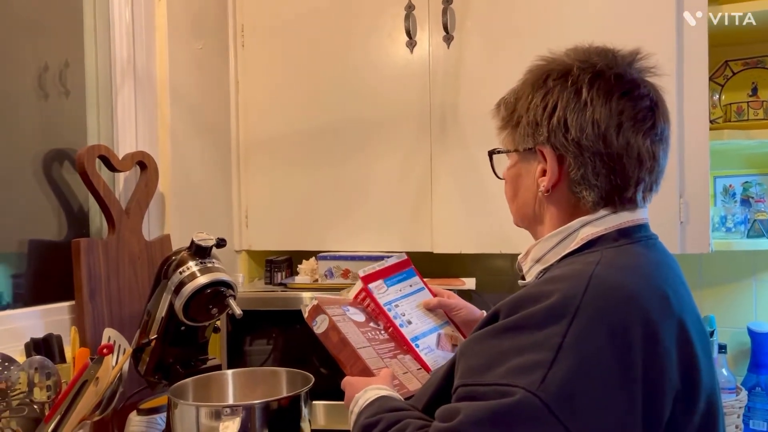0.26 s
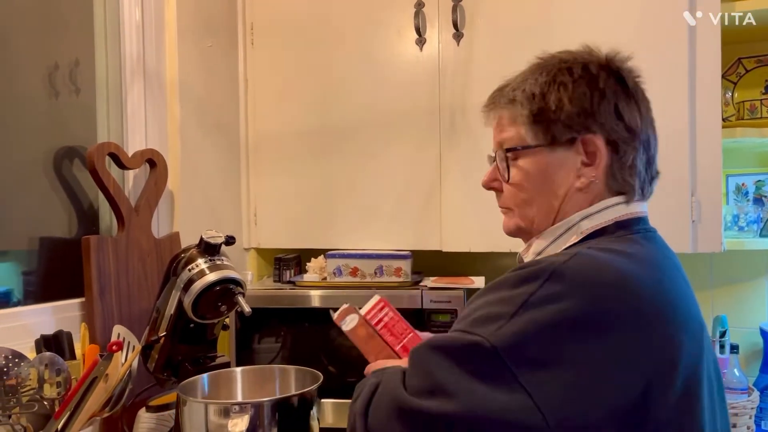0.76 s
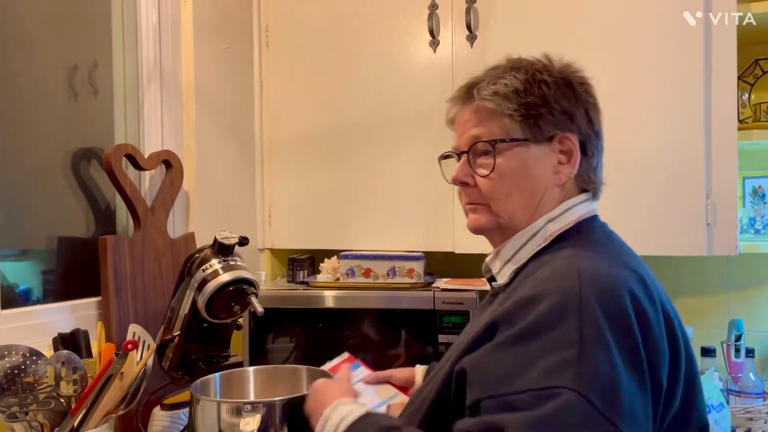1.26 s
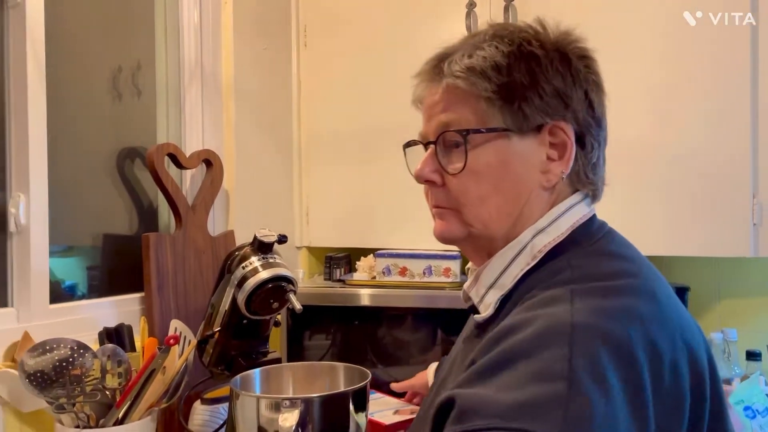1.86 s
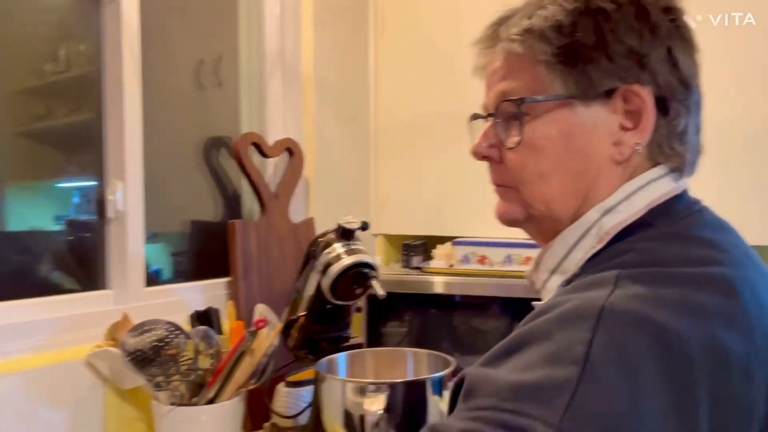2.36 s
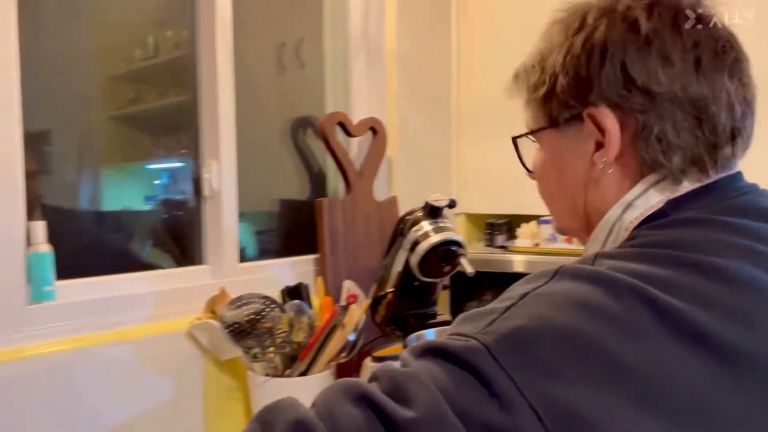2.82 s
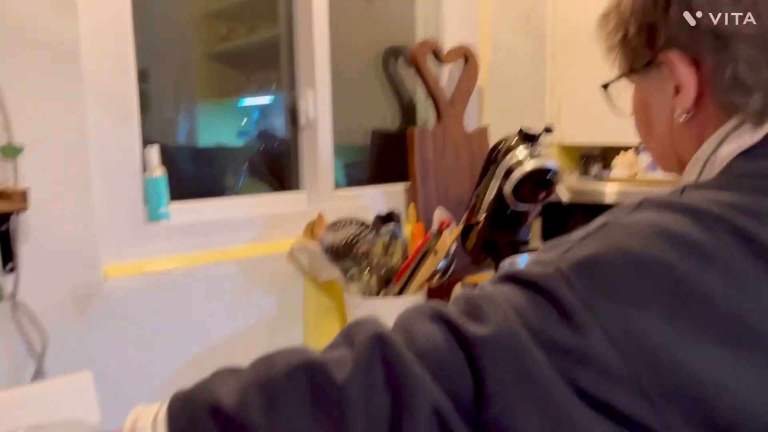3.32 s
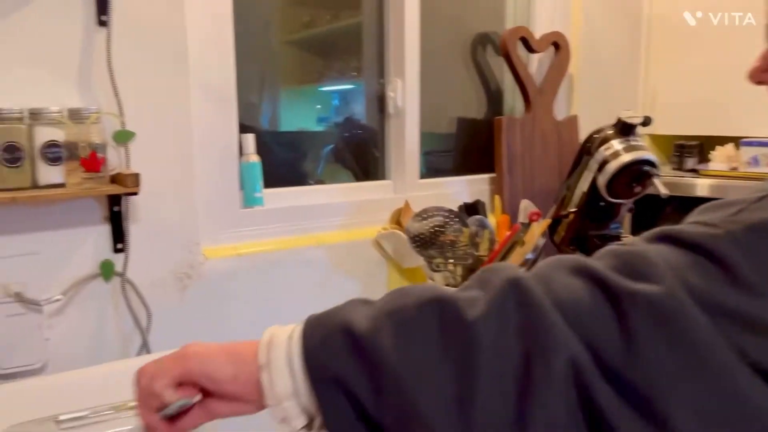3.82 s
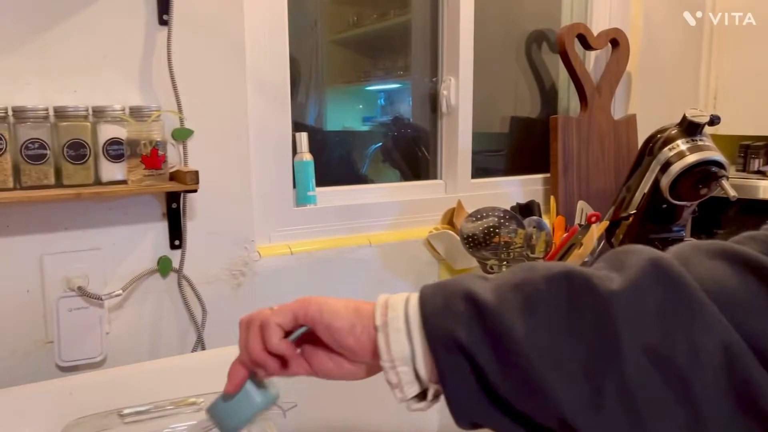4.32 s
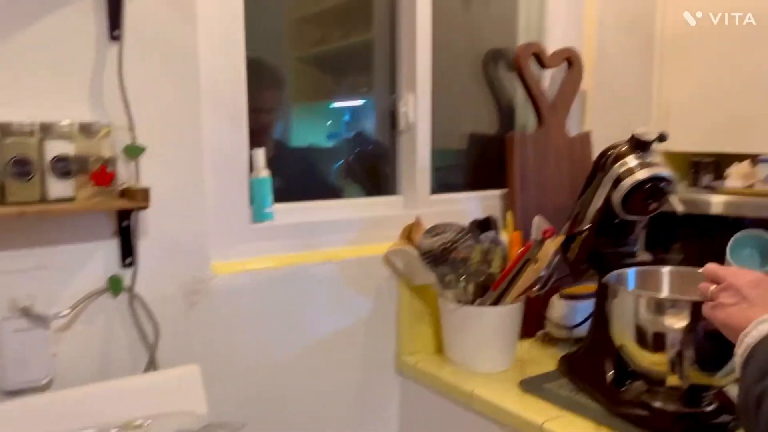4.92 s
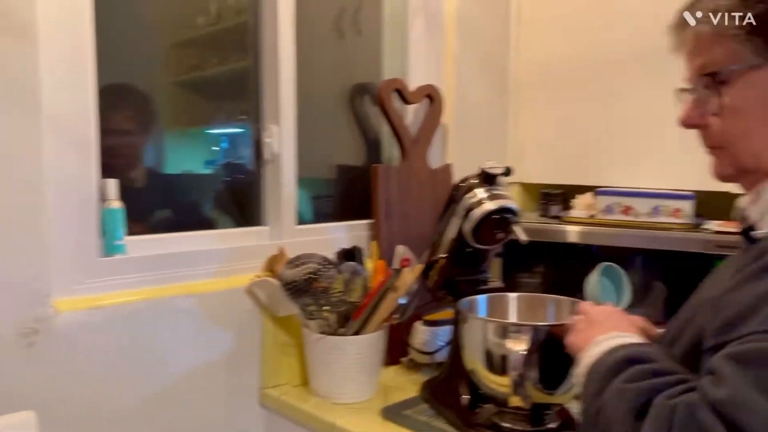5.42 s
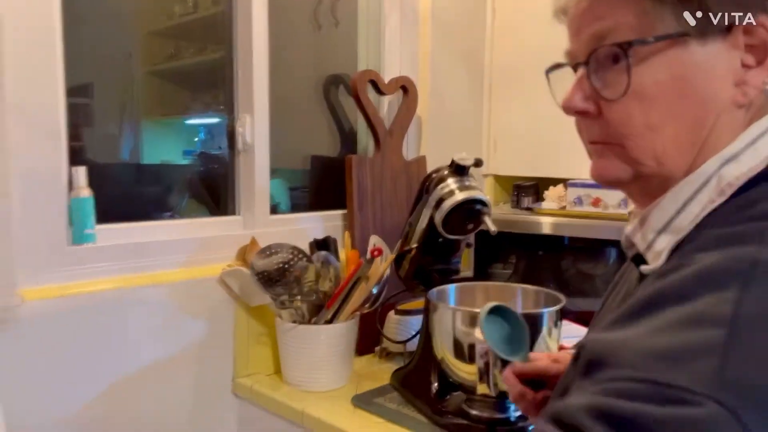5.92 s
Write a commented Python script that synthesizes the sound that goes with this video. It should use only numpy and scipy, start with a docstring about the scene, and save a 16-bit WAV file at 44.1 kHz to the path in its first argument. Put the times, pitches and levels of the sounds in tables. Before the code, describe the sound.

Soft cardboard knocks and rubbing give way to clacking plastic cups and a swishing sleeve, while a kitchen appliance hums.

```python
"""Boxes and measuring cups in a kitchen

Cardboard boxes scrape and thud on the counter. Then plastic measuring cups clack and ring against
each other as one is picked from the pile. Hands rub over the boxes, a sleeve swishes as the arm
reaches, and an appliance hums. The cupboards of the small room answer every knock."""
import sys
import numpy as np
from scipy import signal
from scipy.fft import rfft, irfft, next_fast_len
from scipy.io import wavfile
from scipy.ndimage import map_coordinates

SR = 44100
rng = np.random.default_rng(int(sys.argv[2]) if len(sys.argv) > 2 else 0)


def log_audio(samples):
    """Write samples as a 16-bit WAV file to the path given in sys.argv[1]."""
    # one column per channel
    frames = np.atleast_2d(samples).T
    # limit to full scale, then quantise
    limited = np.clip(frames, -1, 1)
    pcm = np.round(limited * 32767).astype(np.int16)
    wavfile.write(sys.argv[1], SR, pcm)


N = 272375


def amp(db):
    """Turn decibels into a factor to multiply by."""
    return 10 ** (np.asarray(db) / 20)


def unit(x):
    """Scale a sound to an average (rms) level of 1."""
    return x / np.sqrt(np.mean(x ** 2) + 1e-20)


def unit_energy(x):
    """Scale a sound to an energy of 1 per channel."""
    return unit(x) / np.sqrt(x.shape[-1])


def along(points, hz):
    """Read between (frequency, value) points on a log frequency axis."""
    freqs, values = np.transpose(points)
    return np.interp(np.log(hz + 1), np.log(freqs + 1), values)


def wobble(rate):
    """A smooth curve through `rate` random values a second."""
    return map_coordinates(rng.standard_normal(int(N * rate / SR) + 4), [np.arange(N) * rate / SR])


def filtered(x, response):
    """Multiply each frequency in a sound by response(hz)."""
    size = x.shape[-1]
    padded = next_fast_len(size + 2048)
    return irfft(rfft(x, padded) * response(np.fft.rfftfreq(padded, 1 / SR)), padded)[..., :size]


def band(x, edges_hz, order=3):
    """Keep the frequencies between two edges."""
    return signal.sosfilt(signal.butter(order, edges_hz, "band", fs=SR, output="sos"), x)


def fade(t, t60):
    """Die away by 60 dB in t60 seconds, the fade time."""
    return np.exp(-np.log(1000) * t / t60)


def add(track, start, sound):
    """Mix a sound into the track at a start time in seconds."""
    rest = track[:, max(round(start * SR), 0):][:, :sound.shape[-1]]
    rest += sound[:, :rest.shape[-1]]


# How alike the room sounds on the left and right: (frequency [Hz], likeness [0 to 1])
LIKENESS = [(60, 0.94), (250, 0.82), (600, 0.35), (1500, 0.24), (5000, 0.24), (11000, 0)]


def diffuse(size):
    """Noise from all around: alike at both microphones in the bass, unrelated in the treble."""
    def share(hz):
        angle = np.arccos(np.clip(along(LIKENESS, hz), -1, 1)) / 2
        return np.array([np.cos(angle), np.sin(angle)])
    mid, side = filtered(rng.standard_normal((2, size)), share)
    return np.array([mid + side, mid - side])


def shaped_noise(spectrum):
    """Noise from all around with the given tone colour, at a level of 1."""
    return unit(filtered(diffuse(N), lambda hz: amp(along(spectrum, hz))))


def friction(strokes):
    """Loudness of rubbing: each stroke speeds up and slows down in one smooth arch."""
    t = np.arange(N) / SR
    loudness = np.zeros(N)
    for start, length, db in strokes:
        speed = np.abs(np.sin(np.pi * np.clip((t - start) / length, 0, 1)))
        loudness += amp(db) * speed ** 0.8
    return loudness


def strike(tones, crack_t60, ring_db):
    """One hit: a crack of many short wall vibrations, plus the object's own tones at random strengths."""
    t = np.arange(SR // 4) / SR
    hz, db, t60 = np.transpose(tones)[:, :, None]
    strength, phase = rng.standard_normal((2, len(tones), 1))
    ring = amp(db + 4.2 * strength) * fade(t, t60) * np.sin(2 * np.pi * (hz * t + phase))
    crack = rng.standard_normal(len(t)) * fade(t, crack_t60) * (1 - fade(t, 0.0062))
    return unit_energy(crack) + amp(ring_db) * unit_energy(ring.sum(0))


def main_ring(hz, t60):
    """The one tone that a hit brings out, which depends on where the blow lands."""
    t = np.arange(SR // 4) / SR
    return unit_energy(np.sin(2 * np.pi * hz * t) * fade(t, t60))


# How long the kitchen echoes: (frequency [Hz], fade time [s])
ECHO_TIMES = [(150, 0.89), (500, 0.46), (2000, 0.3), (5000, 0.29), (11500, 0.13), (14000, 0.033)]


def in_kitchen(sound, lead_ms, near_db, near_t60, tail_db):
    """Direct sound, first on the left; quick bounces off counter and wall; then the room's echo."""
    size = SR // 2
    t = np.arange(size) / SR
    hz, times, spectrum = signal.stft(diffuse(size), SR, nperseg=256)
    spectrum = spectrum * fade(times, along(ECHO_TIMES, hz)[:, None])
    tail = signal.istft(spectrum, SR, nperseg=256)[1][:, :size]
    tail = unit_energy(tail * (1 - fade(t, 0.058)))
    near = unit_energy(diffuse(size) * fade(t, near_t60) * (1 - fade(t, 0.034)))
    heard = signal.fftconvolve(sound[None], amp(near_db) * near + amp(tail_db) * tail, axes=1)
    delays = np.array([[0], [lead_ms / 1000]])
    heard[:, :len(sound)] += filtered(sound, lambda f: np.exp(-2j * np.pi * f * delays))
    return heard


# Tone colour of the room's rumble: (frequency [Hz], relative level [dB])
ROOM_COLOUR = [(12, -62), (20, -22.5), (59, 1.5), (102, -7.5), (135, 0), (171, -7), (213, -2.5),
               (307, -8.5), (337, -10), (404, -19), (460, -12), (533, -25.5), (754, -22), (1070, -49),
               (1600, -120)]
# The motor's tones: (pitch [Hz], level [dB])
MOTOR_TONES = [(134.2, -56), (220.7, -74.5), (269, -67.5)]


def appliance():
    """A slightly unsteady motor hums over the low rumble of the room."""
    t = np.arange(N) / SR
    hum = np.zeros(N)
    for hz, db in MOTOR_TONES:
        peak = np.sqrt(2) * amp(db + 0.26 * wobble(1.5))
        hum += peak * np.sin(2 * np.pi * hz * t + 0.5 * wobble(4.5))
    return hum + amp(-54.5) * shaped_noise(ROOM_COLOUR)


# A soft bump among the clatter: (start [s], length [s], level [dB])
LOW_BUMP = [(3.665, 0.17, -45)]


def bump():
    """A short, dull rumble, felt more than heard."""
    return friction(LOW_BUMP) * unit(band(diffuse(N), edges_hz=(42, 78)))


# Sleeve swishes: (start [s], length [s], level [dB], first pitch [Hz], last pitch [Hz], width [Hz])
SLEEVE_SWISHES = [(2.508, 0.4, -68, 5530, 6540, 1300), (3.833, 0.87, -62, 6460, 6550, 556),
                  (4.084, 0.67, -66.5, 5630, 5720, 610), (5.56, 0.59, -64.5, 1703, 1975, 1200),
                  (5.68, 0.24, -68.5, 4740, 6600, 1100), (5.85, 0.47, -58, 5790, 5510, 1700),
                  (5.92, 0.34, -63, 4360, 4200, 1600), (5.952, 0.34, -60, 1208, 1391, 1530)]


def sleeve():
    """Ribs of cloth zip over each other: a narrow hiss that glides in pitch as the arm moves."""
    t = np.arange(N) / SR
    track = np.zeros((2, N))
    for start, length, db, first_hz, last_hz, width_hz in SLEEVE_SWISHES:
        pitch = np.interp(t, (start, start + length), (first_hz, last_hz))
        noise = rng.standard_normal((2, N)) + 1.55 * rng.standard_normal(N)  # partly shared by both sides
        ribs = unit(filtered(noise, lambda hz: 1 / (1 + (2 * hz / width_hz) ** 4)))
        tone = np.sqrt(2) * np.cos(2 * np.pi * np.cumsum(pitch) / SR)
        track += friction([(start, length, db)]) * ribs * tone  # the tone lifts the noise to its pitch
    return track * amp(1.7 * wobble(35))


# Tone colours of dry sliding and of rustling cloth: (frequency [Hz], relative level [dB])
SLIDE_COLOUR = [(1500, -33), (3500, -8), (6000, 14), (8000, 10.5), (9300, 15.5), (10600, 5.5), (11500, 8),
                (12500, -9), (14000, -64.5)]
RUSTLE_COLOUR = [(400, 2), (620, 0), (700, 3.5), (820, 3.5), (950, -2), (1200, -5), (1480, -9.5),
                 (1680, 0.5), (1850, -9), (2100, -5), (2320, -3.5), (2650, -7), (2950, -6), (3500, -10.5),
                 (4400, -11), (7000, -19.5)]
# Hands sliding over a box or cup, and the arm reaching: (start [s], length [s], relative level [dB])
HAND_SLIDES = [(0.23, 0.2, -68.5), (0.42, 0.2, -63), (0.585, 0.17, -54.5), (0.7, 0.17, -64),
               (0.91, 0.087, -64.5), (1.05, 0.45, -63), (1.33, 0.39, -59), (5.35, 0.13, -66.5)]
ARM_REACHES = [(2.46, 0.65, -66), (2.9, 0.64, -64), (3.6, 1.15, -60.5), (5.85, 0.55, -60.5)]
# Clothes stirring between moves: (time [s], relative level [dB])
CLOTHES_STIR = [(0.2, -70.5), (0.33, -60.5), (1.7, -59), (1.95, -66.5), (2.6, -62), (4.6, -62),
                (5.22, -65.5), (5.45, -61.5)]


def rubbing():
    """Hands slide and clothes rustle; the pressure swells and dips, fibres catch and let go."""
    hands = friction(HAND_SLIDES) * amp(0.61 * wobble(8.8))
    arm = friction(ARM_REACHES)
    clothes = amp(np.interp(np.arange(N) / SR, *np.transpose(CLOTHES_STIR)))
    # Each move makes both noises: (sliding [dB], rustling [dB]). Their powers add up.
    moves = [(hands, (0.99, 0.53)), (arm, (-0.38, 1)), (clothes, (-11.5, 0))]
    slide_level, rustle_level = np.sqrt(sum(np.outer(amp(mix), move) ** 2 for move, mix in moves))
    slide = slide_level * amp(1.93 * wobble(65)) * shaped_noise(SLIDE_COLOUR)
    rustle = rustle_level * amp(1.2 * wobble(50)) * shaped_noise(RUSTLE_COLOUR)
    return slide + rustle


# Boxes and cups being dragged: (start [s], length [s], level [dB], pitch [Hz])
DRAGS = [(0.223, 0.11, -59.5, 830), (0.35, 0.029, -58, 1480), (0.474, 0.045, -61.5, 1280),
         (0.612, 0.035, -48.5, 730), (0.614, 0.11, -56, 2840), (0.663, 0.044, -43, 697),
         (1.18, 0.019, -57, 4070), (1.384, 0.09, -60.5, 2690), (1.579, 0.025, -42, 1600),
         (1.605, 0.027, -55, 1480), (1.695, 0.026, -62, 1500), (1.7535, 0.0049, -51, 3900),
         (1.757, 0.044, -64.5, 3500), (2.073, 0.033, -66.5, 1330), (3.294, 0.075, -42, 1500),
         (3.383, 0.076, -51, 1470), (3.57, 0.019, -49, 1980), (3.575, 0.16, -53, 1970),
         (3.793, 0.05, -43, 1410), (3.809, 0.19, -48, 2120), (4.005, 0.015, -39.5, 2300),
         (4.933, 0.075, -71, 6040), (5.432, 0.007, -57.5, 6300), (5.35, 0.0053, -63, 6000)]


def scrapes():
    """Surfaces drag across each other: a fast run of tiny slips around one pitch."""
    track = np.zeros((2, N))
    for start, length, db, hz in DRAGS:
        size = int(length * SR)
        slips = rng.standard_normal(size) * rng.exponential(size=size) ** 1.46
        ring = unit(band(slips, edges_hz=(hz * 0.886, hz * 1.03), order=2))
        grit = unit(band(slips, edges_hz=(hz * 0.5, hz * 1.02), order=1))
        stroke = amp(db) * unit(ring + amp(8.5) * grit) * signal.windows.tukey(size, 0.5)
        add(track, start, in_kitchen(stroke, lead_ms=0.02, near_db=-5, near_t60=0.1, tail_db=-8))
    return track


# The tones of a box on the counter: (pitch [Hz], relative level [dB], fade time [s])
BOX_TONES = [(71, -49, 0.6), (118, -3, 0.42), (272, 13.5, 0.021), (376.4, 0.5, 0.32), (446, 10, 0.051),
             (742, -22, 0.093), (1014, 1.5, 0.084), (1258, 9.5, 0.048), (1470, -8.5, 0.15)]
# Box landings and light handling knocks. Thump, slap and boom turn those parts up or down:
# (time [s], relative level [dB], thump [dB], slap [dB], boom pitch [Hz], boom [dB])
BOX_HITS = [(0.351, -52.5, -6, -7, 352, 7.5), (0.514, -36.5, -20, -12.5, 807, 4.5),
            (0.519, -38, -5, -33, 245, 8), (0.539, -44, -4, -25, 235, 7.5), (0.569, -46, -20, -0.5, 248, 4),
            (0.618, -39, 12, -4, 347, 4), (0.643, -42.5, -2, -18, 374, 6.5),
            (0.673, -40, -10, -1, 708, 3.5), (0.768, -47, 14, 0, 381, 4.5), (0.935, -60.5, -4, 9.5, 259, 4),
            (1.184, -50, 14, -8, 355, 2), (1.2197, -40, -25, -1, 705, 5),
            (1.2238, -32.5, -25, -36, 453, 9.5), (1.233, -34.5, -1, -28, 288, 10.5),
            (1.5298, -43.5, -5, -1, 1009, 6.5), (1.538, -40, 13, -22, 267, 9),
            (1.586, -40.5, -5, -1, 270, -5), (1.592, -36.5, 3, -4.5, 254, 8),
            (1.613, -39.5, -5, -10, 254, 3.5), (1.797, -60.5, 4, -1, 203, 8),
            (2.267, -50, 7.5, -5, 663, -5), (2.294, -52.5, -3.5, -1.5, 630, 0),
            (2.298, -47, 10, -12, 202, 9), (5.331, -52.5, -8, -8, 777, 0.5), (5.427, -54, 6, 1.5, 260, -2),
            (5.603, -56.5, 8, 4, 940, -1)]


def boxes():
    """Cardboard thuds softly on the counter: the box booms while its sides slap and scuff."""
    track = np.zeros((2, N))
    for start, db, thump_db, slap_db, boom_hz, boom_db in BOX_HITS:
        hit = strike(BOX_TONES, crack_t60=0.045, ring_db=-10.5)
        thud = unit_energy(band(hit, edges_hz=(260, 780)))
        thump = amp(thump_db - 10) * unit_energy(band(hit, edges_hz=(125, 280), order=2))
        slap = amp(slap_db - 2.5) * unit_energy(band(hit, edges_hz=(850, 1900)))
        # The scuff hardly grows with a harder blow.
        scuff = amp(-59.5 + 0.1 * db) * unit_energy(band(hit, edges_hz=(2200, 5500), order=2))
        landing = amp(24.5) * (amp(db) * (thud + thump + slap) + scuff)
        add(track, start, in_kitchen(landing, lead_ms=0.021, near_db=0.5, near_t60=0.21, tail_db=-11.5))
        # The boom reaches the microphones almost straight.
        boom = amp(23.5 + db + boom_db) * main_ring(boom_hz, t60=0.058)
        add(track, start, in_kitchen(boom, lead_ms=0.013, near_db=-7, near_t60=0.2, tail_db=-13))
    return track


# The tones of the plastic cups: (pitch [Hz], relative level [dB], fade time [s])
CUP_TONES = [(296.7, 0, 0.081), (369, -13.5, 0.45), (743, -9.5, 0.11), (988, -9, 0.17), (1041, -1, 0.14),
             (1318, -7.5, 0.091), (1418, -15.5, 0.37), (1518, -8, 0.11), (1770, -11, 0.12),
             (2070, -5.5, 0.13), (2160, -7, 0.13), (2230, -22.5, 0.13), (2580, -7.5, 0.091),
             (2630, -21, .16), (2800, -17, 0.17), (3410, -6, 0.15), (3932, 3.5, 0.074), (4850, -2.5, 0.093),
             (6470, -9, 0.11), (7850, -13.5, 0.15), (8800, -12, 0.14), (11000, -14.5, 0.081)]
# The clatter is heard first from the left, later from the middle: (time [s], head start of the rim's tick on
# the left [ms])
CUP_DIRECTION = [(2.85, .07), (3.2, .062), (3.55, .015), (4.1, 0)]
# The hollow knock leans left, the crack slightly right: (frequency [Hz], left minus right [dB])
CUP_BALANCE = [(150, 1.5), (550, 3.5), (2200, 0), (4500, -1.5), (9000, 1.5)]
# Cup hitting cup. Each [dB] column after the level turns one part up or down against the clack:
# (time [s], relative level [dB], knock [dB], crack [dB], snap [dB], clack pitch [Hz],
#  struck cup's pitch [Hz], its ring [dB], other cup's pitch [Hz], its ring [dB])
CUP_HITS = [(2.85, -44, -9, -5, -8, 1770, 1094, 2.5, 760, -11),
            (2.858, -34.5, -3.5, -3.5, -15, 1680, 740, -6, 1500, -11),
            (2.8643, -26.5, -3, -24, -23, 2090, 2043, -7.5, 746, -8.5),
            (2.874, -33.5, -3.5, -12, -30, 1980, 2140, -7, 1550, -13),
            (2.9497, -24, -20, -12, -10.5, 2190, 2006, -1.5, 2580, -8.5),
            (2.958, -29.5, -5, -4, 4.5, 2030, 2407, 2.5, 1346, -5),
            (3.1725, -28, -26, -0.5, 14, 1850, 1990, -6.5, 3460, -13.5),
            (3.1901, -15.5, -41.5, -13.5, -10.5, 1840, 2000, -5.5, 1387, -13.5),
            (3.202, -37.5, -13.5, -16, -19.5, 2110, 1834, 9.5, 2320, 11.5),
            (3.287, -36, -1.5, -9, -17, 1800, 1980, -11, 1304, 1),
            (3.296, -27.5, -27, -7, 3.5, 2240, 2680, -3, 1490, -6),
            (3.3133, -28, -21, -5, 0, 2140, 2220, -17, 2540, 1),
            (3.3235, -25, -17.5, -25, -30, 2100, 2760, -15, 1337, -5),
            (3.3304, -32, 2, -28, -30, 1900, 1977, 8.5, 1373, -9),
            (3.3617, -42, -1, -18, 6.5, 1700, 1355, 1, 1990, -12),
            (3.371, -29.5, -19, -11.5, -8, 1810, 2000, -5, 2315, -20),
            (3.417, -49, 12, -19, -17, 1610, 1340, -7, 1010, -9),
            (3.425, -46, 6, -9, -22, 1600, 1380, 8, 743, 2.5),
            (3.481, -52, 13, -19, -30, 1600, 1430, 2, 1017, -9),
            (3.586, -30, -6.5, -8.5, -12.5, 1890, 1493, 0, 1030, -7),
            (3.599, -30.5, -0.5, -14, -20, 1910, 1023, 1, 2196, -4),
            (3.624, -33, 0.5, -17, -26, 1780, 1990, -3, 2845, -8.5),
            (3.681, -43.5, -3, -29, -29, 1760, 1030, -1, 1540, 2),
            (3.706, -43, 1, -32, -32, 1670, 2250, -4, 1510, -2),
            (3.814, -25.5, -13, -7.5, -14, 1530, 1174, -2.5, 1015, -16),
            (3.8224, -30.5, -5, -4.5, -25, 1780, 1920, 5.5, 1335, -9),
            (3.8393, -27.5, 0, -12.5, -22, 1840, 1280, -11, 2180, 3.5),
            (3.8484, -41.5, 1, -9, -28, 1800, 1480, 1.5, 2795, 6),
            (4.015, -24, -4.5, -11, -21.5, 2060, 2080, 0, 2455, -5.5),
            (4.106, -33, -2.5, -14, -23, 1930, 2107, -2, 2480, -9)]


def cups():
    """Two cups meet: the walls clack, the hollow knocks, both cups ring and the rims snap brightly."""
    track = np.zeros((2, N))
    for start, db, knock_db, crack_db, snap_db, clack_hz, ring_hz, ring_db, other_hz, other_db in CUP_HITS:
        lead_ms = np.interp(start, *np.transpose(CUP_DIRECTION))
        flatness = amp(knock_db) / (1 + amp(knock_db))  # a flat hit scuffs for longer than a sharp one
        wall = strike(CUP_TONES, crack_t60=0.01 + 0.025 * flatness, ring_db=-9.5)
        clack = unit_energy(band(wall, edges_hz=(clack_hz * 0.7, clack_hz * 1.406), order=4))
        knock = amp(knock_db - 2) * unit_energy(band(wall, edges_hz=(240, 1050)))
        ring = amp(ring_db) * main_ring(ring_hz, t60=0.075)
        ring += amp(other_db) * main_ring(other_hz, t60=0.125)
        # Low sounds bend around the microphones' housing, so their head start is longer.
        body = in_kitchen(clack + knock + ring, 1.6 * lead_ms, near_db=-8.5, near_t60=0.1, tail_db=-11)
        # The hard rim ticks: its crack bounces off the counter, its snap comes almost straight.
        rim = strike(CUP_TONES, crack_t60=0.0095, ring_db=-8)
        crack = amp(crack_db + 1) * unit_energy(band(rim, edges_hz=(2800, 7700)))
        snap = amp(snap_db + 0.5) * unit_energy(band(rim, edges_hz=(8100, 10700), order=2))
        tick = in_kitchen(crack, lead_ms, near_db=-4.5, near_t60=0.06, tail_db=-10.5)
        tick += in_kitchen(snap, lead_ms, near_db=-12.5, near_t60=0.08, tail_db=-15)
        add(track, start, amp(db + 23) * (body + tick))
    return filtered(track, lambda hz: amp(np.outer([1, -1], along(CUP_BALANCE, hz)) / 2))


def scene():
    """All the sounds of the kitchen together."""
    return cups() + boxes() + scrapes() + rubbing() + sleeve() + bump() + appliance()


def record(dry):
    """The microphone's treble peaks near 11 kHz, then falls away and ends at 16.5 kHz."""
    # (frequency [Hz], gain [dB])
    colour = [(9700, 1.5), (10600, -4.5), (11200, 8), (12000, -5.5),
              (12700, -18), (14500, -22), (16500, -26)]
    return filtered(dry, lambda hz: amp(along(colour, hz)) * (hz < 16500))


dry = scene()
out = record(dry)
log_audio(out)
```